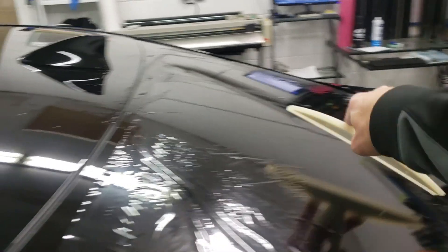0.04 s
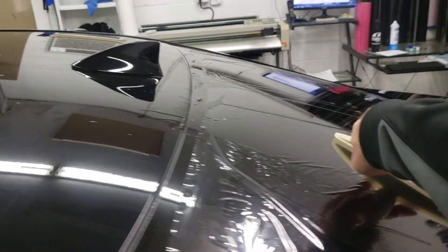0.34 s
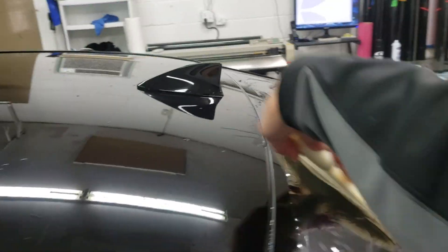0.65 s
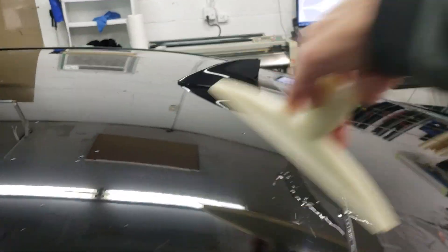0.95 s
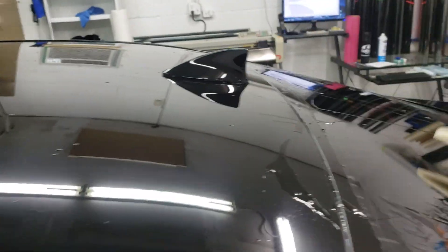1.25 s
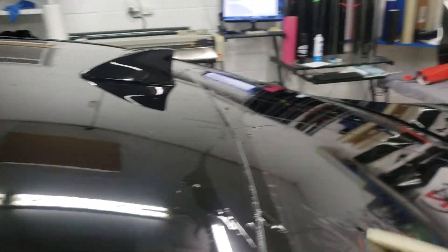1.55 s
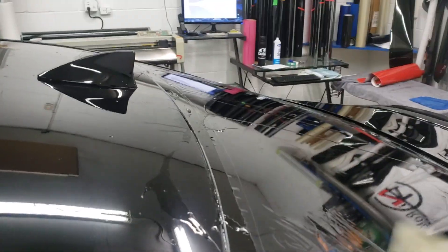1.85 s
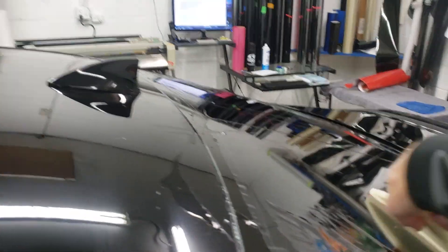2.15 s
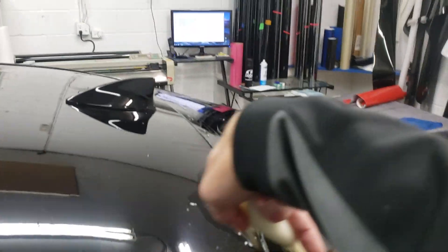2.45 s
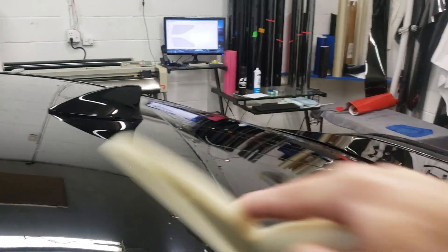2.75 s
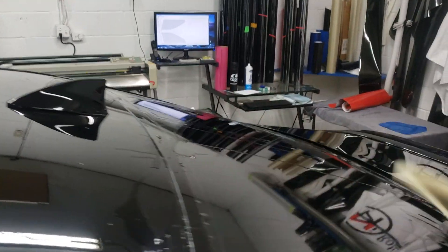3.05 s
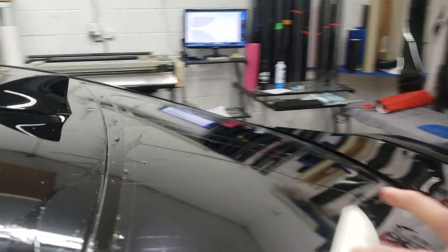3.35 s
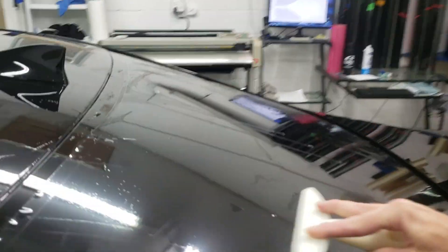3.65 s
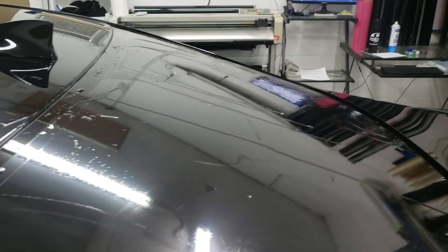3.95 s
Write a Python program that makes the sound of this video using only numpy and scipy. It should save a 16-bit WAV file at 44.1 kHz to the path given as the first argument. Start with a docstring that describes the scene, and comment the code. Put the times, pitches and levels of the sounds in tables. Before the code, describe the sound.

Close, thin hissing swipes of a squeegee on filmed glass come and go over a workshop's machine hum and ventilation. One sharp snap comes early and two short squeaks follow, among light ticks and a few low thumps.

```python
"""A quiet workshop with a steady machine hum, where a plastic squeegee is worked over film on a car's glass.
Sliding friction makes blade and sleeve swish, with thin whistles whose pitch rises and falls with speed.
The film ticks; the blade snaps off the edge, rings freely, rasps, and squeaks twice by stick-slip motion.
Four dull thumps, probably steps, excite low damped modes underneath, and the room reverberates."""
import sys
import numpy as np
from scipy import signal
from scipy.fft import rfft, irfft
from scipy.io import wavfile

SR = 44100
rng = np.random.default_rng(int(sys.argv[2]) if len(sys.argv) > 2 else 0)


def to_wav(s):
    """Save 16-bit WAV."""
    ch = np.atleast_2d(s).T  # columns
    pcm = np.round(np.clip(ch, -1, 1) * 32767)  # PCM
    wavfile.write(sys.argv[1], SR, pcm.astype(np.int16))


N = 176400

# Throughout, pan_db is left minus right, and gain_db in a spectrum is relative.
# main machine hum: time_s, level_db, pan_db
HUM_ENVELOPE = [(0.04, -31.5, 0.5), (0.44, -29.5, -2.0), (1.17, -31, -4.5), (2.03, -29, -4.0),
                (2.66, -30, -5.0), (3.11, -29.5, -4.0), (3.6, -28, -1.5), (3.73, -31, 0), (3.96, -31, 1)]
# weaker machine tones: pitch_hz, level_db
MACHINE_TONES = [(95, -48.5), (120, -50.5), (146.5, -82.5), (183, -60.5), (480, -62.5), (1178, -80),
                 (15150, -81)]
# ventilation spectrum: frequency_hz, gain_db
AIR_SPECTRUM = [(20, -28.5), (33, -17), (52, 1), (100, -1), (200, 1.5), (290, -3), (330, -5), (460, -6),
                (600, -15), (1000, -20.5), (1700, -28.5), (3000, -34), (4600, -34), (6000, -38),
                (7400, -50), (8300, -45.5), (9400, -36.5), (10800, -34), (12000, -26.5), (13800, -33.5),
                (16000, -36.5)]
# ventilation loudness: time_s, level_db
AIR_ENVELOPE = [(0, -39.5), (.7, -41.5), (.85, -40.5), (1.2, -40.5), (2, -39.5), (2.7, -39.5), (3.3, -40),
                (4, -39.5)]
# ventilation balance: frequency_hz, pan_db
AIR_BALANCE = [(40, -2.5), (200, -1.5), (450, -5), (1000, -1), (2000, 6.5), (3200, 7), (4700, 8),
               (6500, 3.5), (8700, -4), (12000, -10.5), (15500, 1.5)]
# likeness of the ventilation's two channels: frequency_hz, correlation
AIR_CORRELATION = [(40, 0.89), (280, 0.98), (500, 0.45), (900, 0), (2000, 0), (16000, 0)]
# colour of close sounds at the microphone: frequency_hz, gain_db
CLOSE_SPECTRUM = [(100, -31.5), (1000, -6.5), (2500, -13.5), (4500, -19), (6300, -21), (7600, -23.5),
                  (8400, -26), (9400, -10.5), (10600, -9), (11900, -1), (13800, -10), (16000, -11.5)]
# squeegee strokes: peak_s, rise_s, fall_s, level_db, pan_db, scrape_gain_db
STROKES = [(.11, .08, 0.113, -58.5, -18, -13), (.32, 0.058, 0.14, -54, -11.5, -11.5),
           (.63, .07, 0.16, -50, -7.5, -13.5), (.81, 0.076, 0.1, -56, 3, -29),
           (1.3, 0.17, .15, -54.5, -11, -20), (1.39, 0.082, 0.069, -42.5, -8, -24),
           (1.66, 0.18, 0.29, -50.5, -5, -14), (2.44, 0.09, 0.095, -51, -1, -21),
           (2.7, 0.14, 0.2, -60.5, -13, -9.5), (3.738, 0.065, 0.11, -45.5, -8.5, -13),
           (3.9, 0.08, 0.17, -50.5, -5.5, -4.5)]
# swish under light pressure: frequency_hz, gain_db
LIGHT_SPECTRUM = [(200, -42), (5000, -14), (8000, -9.5), (9500, 3), (11500, 8), (13000, 9), (16000, 6.5)]
# swish under heavy pressure: frequency_hz, gain_db
HEAVY_SPECTRUM = [(200, -25.5), (5000, -10), (8000, -3.5), (9500, 6.5), (11500, 4.5), (13000, -7),
                  (16000, -7)]
# scrape below the swish: frequency_hz, gain_db
SCRAPE_SPECTRUM = [(200, -10.5), (700, 1.5), (2300, 5), (4500, 1), (6300, -4.5), (7600, -11), (16000, -27)]
# friction whistles: peak_s, half_length_s, top_pitch_hz, sag_fraction, level_db
WHISTLE_ARCS = [(.105, .085, 14700, .085, -62), (.11, .085, 11950, .05, -58.5), (.115, .06, 9300, .05, -65),
                (.25, .07, 11600, .03, -56), (.26, .08, 12300, .05, -59), (.355, .04, 9650, .08, -61),
                (.355, .07, 15400, .13, -62), (.545, .06, 12600, .06, -60), (.605, .045, 11750, .06, -54),
                (.66, .07, 12700, .09, -58), (2.455, .06, 11550, .035, -49.5),
                (2.405, .035, 11400, .11, -57), (2.435, .04, 10300, .06, -60),
                (2.728, .04, 11000, .08, -56)]
# ticks of the film: start_s, level_db, pan_db, decay_s, centre_hz
FILM_TICKS = [(.03, -40, -8, 0.0018, 12600), (0.2404, -25, -5, 0.0009, 12800),
              (.585, -41, -11, .002, 11700), (.739, -36, 3, 0.0018, 14000), (.748, -39.5, 7, .002, 14000),
              (.809, -37.5, 1, .002, 11200), (.85, -48, 6, .002, 9360), (1.5464, -28.5, -1, 0.0013, 14000),
              (1.551, -34.5, -8, .0016, 12300), (1.586, -43, -6, .0016, 12000),
              (1.617, -42, -11, 0.0011, 10500), (1.6311, -24.5, -12, 0.00055, 10700),
              (1.646, -38, 1, 0.0013, 11000), (1.686, -40, -2, 0.00138, 10000),
              (1.703, -37, -12, .0016, 11000), (1.933, -37, 3, 0.001, 9700), (3.684, -45, -8, .002, 12000),
              (3.98, -41.5, -16, .0016, 10800)]
# soft heavy blows: start_s, level_db, tilt_db_per_octave, pan_db
BLOWS = [(.254, -28, -1, -4), (1.383, -28, 1, -3.5), (2.169, -30.5, 2, -2.5), (3.684, -26, -4, -3)]
# modes the blows excite: pitch_hz, gain_db, t60_s
BLOW_MODES = [(101.7, 1, .25), (146, 2.5, 0.23), (200.6, 1, 0.093), (285, -3.5, 0.17), (400, -12.5, .12)]
# loose shudder after a blow: frequency_hz, gain_db
SHUDDER_SPECTRUM = [(40, -32), (85, -4), (150, 2.5), (210, -5.5), (330, -12), (600, -26.5), (1500, -46),
                    (5000, -62)]
# hard contacts within the thumps: start_s, level_db
CONTACTS = [(.253, -41), (.2925, -35), (1.384, -34), (1.4, -39.5), (1.42, -43.5), (2.169, -46.5),
            (3.685, -38.5)]
# colour of those contacts: frequency_hz, gain_db
CONTACT_SPECTRUM = [(60, -19.5), (300, -2), (700, 6.5), (1000, -7.5), (1500, -8.5), (2500, -26.5),
                    (5000, -22.5), (7500, -40), (16000, -39.5)]
# blade snapping off the edge: start_s, level_db, decay_s
BLADE_SNAPS = [(0.9044, -23, .003), (.912, -34, 0.021)]
# colour of the snap: frequency_hz, gain_db
SNAP_SPECTRUM = [(100, -11), (450, 19), (750, 0.5), (1600, -1.5), (3000, -18), (6500, -13), (7600, -25),
                 (9300, -5), (10600, -5), (11900, 12), (13800, -0.5), (16000, 1)]
# hollow ring of the freed blade: pitch_hz, level_db, t60_s
BLADE_RING = [(430, -51, 0.09), (511, -35, 0.19), (1100, -57.5, 0.11), (1424, -51.5, 0.14),
              (1830, -55, 0.096)]
# dry catches of the blade: start_s, length_s, level_db, pan_db
BLADE_RASPS = [(0.919, .03, -48, 0), (2.641, .014, -41.5, 5), (2.649, .035, -44, 4)]
# colour of the rasps: frequency_hz, gain_db
RASP_SPECTRUM = [(1000, -11), (3500, -2), (6000, 10), (9500, -3), (11500, 5), (14000, 9), (16000, 5)]
# course of each squeak: time_s, pitch_hz, level_db, roughness_fraction
SQUEAK_PATHS = [
    [(1.787, 2000, -54, .25), (1.793, 1950, -36, .25), (1.803, 1915, -35, .35), (1.812, 1820, -33.5, .45),
     (1.824, 1725, -33.5, .55), (1.833, 1850, -42, .6), (1.845, 1900, -56, .7)],
    [(2.654, 1230, -60, .4), (2.665, 1200, -47, .2), (2.675, 1185, -44, .1), (2.684, 1200, -49, .2),
     (2.695, 1220, -60, .4)],
]
# resonances of blade and glass for each squeak: pan_db, rows of (frequency_hz, gain_db)
SQUEAK_RESONANCES = [(-1, [(800, -26), (1850, -9), (2500, -17), (3300, 2), (3520, 1.5), (3900, -7),
                     (4400, -14), (5200, -9), (5800, -6), (6800, -22), (8400, -20), (9500, -6), (10800, 1),
                     (11600, -1), (13300, 0), (14500, -12)]), (5, [(600, -18), (1190, 0), (2400, -5),
                     (3500, -24), (5000, -22), (7600, -28), (10500, -10), (12800, -4), (15500, -12)])]
# balance across a squeak's spectrum: frequency_hz, pan_db
SQUEAK_BALANCE = [(2000, 0), (5700, 3.5), (9500, 1), (13000, 3)]
# reverberation time of the workshop: frequency_hz, t60_s
ROOM_DECAY = [(100, 0.27), (1000, 0.72), (4000, .5), (10000, 0.35), (16000, 0.59)]


def amp(db):
    """Amplitude grows tenfold for every 20 decibels."""
    return 10 ** (np.asarray(db) / 20)


def unit(x):
    """Normalisation to rms 1."""
    return x / np.sqrt(np.mean(x ** 2) + 1e-20)


def read(points, hz):
    """Interpolation on a log-frequency axis."""
    f, value = np.transpose(points)
    return np.interp(np.log(hz + 1), np.log(f + 1), value)


def pan(db):
    """A level difference between left and right gives direction."""
    return amp([[db / 2], [-db / 2]])


def add(mix, start_s, sound):
    """Superposition: a sound sums into the mix from its start time."""
    part = mix[:, max(round(start_s * SR), 0):][:, :sound.shape[-1]]
    part += sound[..., :part.shape[1]]


def colour(x, *curves, size=4096):
    """Minimum-phase filtering at unit power; spectra in cascade add in decibels."""
    db = sum(read(c, abs(np.fft.fftfreq(size, 1 / SR))) for c in curves)
    response = np.exp(np.conj(signal.hilbert(np.log(amp(db)))))
    taps = np.fft.ifft(response).real[:size // 2]
    return signal.oaconvolve(x, taps[None] / np.linalg.norm(taps), axes=1)[:, :N]


def drift(rate_hz, count=N):
    """Low-passed noise gives a random fluctuation of rms about 1."""
    spectrum = rfft(rng.standard_normal(N)) / (1 + (np.fft.rfftfreq(N, 1 / SR) / rate_hz) ** 4)
    return unit(irfft(spectrum, N))[:count]


def burst(decay_s):
    """A brief contact is broadband: exponentially decaying noise, independent in each channel."""
    t = np.arange(SR // 8) / SR
    return rng.standard_normal((2, len(t))) * np.exp(-t / decay_s)


def ring(modes, t):
    """Free vibration is a sum of damped sinusoidal modes."""
    return sum(amp(db - 60 * t / t60) * np.sin(2 * np.pi * hz * t) for hz, db, t60 in modes)


def machine_hum(pitch_hz=239.9, waver_db=0.4548, waver_rad=0.36):
    """Periodic vibration radiates tones: a strong one wavers in level, weaker ones in phase."""
    t = np.arange(N) / SR
    times, db, pan_db = np.transpose(HUM_ENVELOPE)
    side = np.interp(t, times, pan_db)
    level_db = np.interp(t, times, db) + waver_db * drift(3.6) + np.array([side, -side]) / 2
    hum = amp(level_db) * np.sin(2 * np.pi * pitch_hz * t)
    tones = sum(amp(db) * np.sin(2 * np.pi * hz * t + waver_rad * drift(7.4))
                for hz, db in MACHINE_TONES)
    return np.sqrt(2) * (hum + tones)


def ventilation():
    """Broadband air noise is partly coherent: the channels agree in the bass but not in the treble."""
    t, hz = np.arange(N) / SR, np.fft.rfftfreq(N, 1 / SR)
    left, independent = rfft(rng.standard_normal((2, N)))
    correlation, side = np.clip(read(AIR_CORRELATION, hz), -1, 1), read(AIR_BALANCE, hz)
    right = correlation * left + np.sqrt(1 - correlation ** 2) * independent
    spectrum = np.array([left, right]) * amp(read(AIR_SPECTRUM, hz) + np.array([side, -side]) / 2)
    return amp(np.interp(t, *np.transpose(AIR_ENVELOPE))) * unit(irfft(spectrum, N))


def swipes(grains_per_s=1000, grain_depth=0.25, grain_spread_db=6, flutter_db=1, half_dark_db=-44):
    """Sliding friction makes grainy hiss that darkens with pressure, over a lower scrape."""
    t = np.arange(N) / SR
    swish_power, scrape_power = np.zeros((2, N)), np.zeros(N)
    for peak_s, rise_s, fall_s, db, pan_db, scrape_db in STROKES:
        swell = amp(db) * np.exp(-((t - peak_s) / np.where(t < peak_s, rise_s, fall_s)) ** 2)
        swish_power += (swell * pan(pan_db)) ** 2
        scrape_power += (swell * amp(scrape_db)) ** 2
    pressed = swish_power.mean(0) / (swish_power.mean(0) + amp(half_dark_db) ** 2)
    onsets = rng.random(N) < grains_per_s / SR
    grains = onsets * amp(grain_spread_db * np.minimum(rng.exponential(1, N), 4))
    texture = 1 + grain_depth * unit(grains)
    light, heavy = (unit(rng.standard_normal((2, N)) * texture) * amp(flutter_db * drift(60))
                    for _ in range(2))
    swish = colour(light * np.sqrt(swish_power * (1 - pressed)), CLOSE_SPECTRUM, LIGHT_SPECTRUM)
    swish += colour(heavy * np.sqrt(swish_power * pressed), CLOSE_SPECTRUM, HEAVY_SPECTRUM)
    return swish + colour(light * np.sqrt(scrape_power), SCRAPE_SPECTRUM)


def whistle(half_s, top_hz, sag, fuzz=0.45, width_hz=70):
    """Fine ribs rubbing past each other sing at their passing rate, which arches with stroke speed."""
    u = np.arange(-half_s, half_s, 1 / SR) / half_s
    phase = 2 * np.pi * np.cumsum(top_hz * (1 - sag * u ** 2)) / SR
    waver = 1 + fuzz * (drift(width_hz, len(u)) + 1j * drift(width_hz, len(u)))
    return unit((waver * np.exp(1j * phase)).real) * np.sqrt(np.maximum(1 - u ** 2, 0))


def whistles(neighbours=2, neighbour_db=-7, pitch_spread=0.06, time_spread_s=0.03):
    """Several contact points sound at once, so fainter detuned whistles superpose on each main one."""
    out = np.zeros((2, N))
    for peak_s, half_s, top_hz, sag, db in WHISTLE_ARCS:
        gain = amp(db) * pan(-7)
        add(out, peak_s - half_s, gain * whistle(half_s, top_hz, sag))
        for shift, detune in rng.uniform(-1, 1, (neighbours, 2)):
            neighbour = whistle(half_s, top_hz * (1 + pitch_spread * detune), sag)
            add(out, peak_s - half_s + time_spread_s * shift, gain * amp(neighbour_db) * neighbour)
    return out


def film_ticks(impulse_height=2.44, skirt_db=-13):
    """Impulse excitation: each crack of the film and its noisy tail pass through one broad resonance."""
    out = np.zeros((2, N))
    for start_s, db, pan_db, decay_s, hz in FILM_TICKS:
        resonance = [(hz * .7, skirt_db), (hz, 0), (hz * 1.4, skirt_db)]
        crack = burst(decay_s) + impulse_height * signal.unit_impulse(SR // 8)
        add(out, start_s, amp(db) * pan(pan_db) * colour(crack, CLOSE_SPECTRUM, resonance))
    return out


def thumps(rise_s=0.0033, pivot_hz=140, shudder_db=-4.5, shudder_s=0.023, contact_decay_s=0.009):
    """Soft impacts excite low modes and a loose shudder; short hard contacts add higher frequencies."""
    body, knocks = np.zeros((2, 2, N))
    t = np.arange(SR // 2) / SR
    for start_s, db, tilt, pan_db in BLOWS:
        modes = [(hz, gain + tilt * np.log2(hz / pivot_hz), t60) for hz, gain, t60 in BLOW_MODES]
        blow = -ring(modes, t) * (1 - np.exp(-t / rise_s))
        loose = rng.standard_normal((1, len(t))) * t / shudder_s * np.exp(1 - t / shudder_s)
        spectrum = [(hz, gain + tilt * np.log2(hz / pivot_hz)) for hz, gain in SHUDDER_SPECTRUM]
        shudder = amp(shudder_db) * colour(loose, spectrum)[:, :len(t)]
        add(body, start_s, amp(db) * pan(pan_db) * (blow + shudder))
    for start_s, db in CONTACTS:
        add(knocks, start_s, amp(db) * burst(contact_decay_s))
    return body + colour(knocks, CONTACT_SPECTRUM)


def blade_snap():
    """Sudden release at the edge gives a sharp transient and leaves the blade in free vibration."""
    cracks, ringing = np.zeros((2, 2, N))
    for start_s, db, decay_s in BLADE_SNAPS:
        add(cracks, start_s, amp(db) * burst(decay_s))
    add(ringing, BLADE_SNAPS[0][0], ring(BLADE_RING, np.arange(SR // 4) / SR))
    return colour(cracks, SNAP_SPECTRUM) + ringing


def blade_rasps():
    """Dry friction gives a short swell of bright noise wherever the blade catches."""
    out = np.zeros((2, N))
    for start_s, length_s, db, pan_db in BLADE_RASPS:
        t = np.arange(0, length_s, 1 / SR)
        swell = np.sin(np.pi * np.sqrt(t / length_s))
        add(out, start_s, amp(db) * pan(pan_db) * swell * rng.standard_normal((2, len(t))))
    return colour(out, CLOSE_SPECTRUM, RASP_SPECTRUM)


def blade_squeaks(jitter=0.065, shimmer=0.49, hiss_db=-4.5):
    """Stick-slip oscillation gives a harmonic series that jitters and turns to hiss as it roughens."""
    out = np.zeros((2, N))
    for path, (pan_db, resonances) in zip(SQUEAK_PATHS, SQUEAK_RESONANCES):
        times, hz, db, rough = np.transpose(path)
        t = np.arange(times[0], times[-1], 1 / SR)
        hz, db, rough = (np.interp(t, times, v) for v in (hz, db, np.clip(rough, 0, 1)))
        phase = 2 * np.pi * np.cumsum(hz * (1 + jitter * rough * drift(600, len(t)))) / SR
        for channel, sign in enumerate((1, -1)):
            harmonics = np.zeros(len(t))
            for n in range(1, 14):
                gain = (n * hz < SR / 2) * (1 + shimmer * drift(110, len(t)))
                harmonics += gain * np.sin(n * phase + 2 * np.pi * rng.random())
            hiss = amp(hiss_db) * rng.standard_normal(len(t))
            slips = np.sqrt(1 - rough) * unit(harmonics) + np.sqrt(rough) * hiss
            slips *= amp(db + sign * pan_db / 2)
            balance = [(f, sign * side / 2) for f, side in SQUEAK_BALANCE]
            add(out[channel:channel + 1], times[0], colour(slips[None], resonances, balance))
    return out


def room(x):
    """Reverberation is convolution with sparse reflections, each band decaying at its own rate."""
    taps = rng.standard_normal((2, SR)) * (rng.random((2, SR)) < .1)
    taps[:, :SR // 250] = 0  # 4 ms before the first reflection
    hz, t, bands = signal.stft(taps, SR, nperseg=256)
    decay = amp(-60 * t / read(ROOM_DECAY, hz)[:, None])
    tail = signal.istft(bands * decay, SR, nperseg=256)[1]
    return signal.fftconvolve(x, tail / np.linalg.norm(tail[0]), axes=1)[:, :N]


def scene(room_db=-10, squeak_room_db=-7.5):
    """Direct sound, its reflections and the workshop's background add by superposition."""
    work = swipes() + whistles() + film_ticks() + thumps() + blade_snap() + blade_rasps()
    squeaks = blade_squeaks()
    reflections = room(amp(room_db) * work + amp(squeak_room_db) * squeaks)
    return machine_hum() + ventilation() + work + squeaks + reflections


def record(dry, cutoff_hz=15900):
    """Band limiting: a linear-phase low-pass filter removes the highest treble."""
    taps = signal.firwin(511, cutoff_hz, window=("kaiser", 9), fs=SR)
    return signal.oaconvolve(dry, taps[None], "same")


dry = scene()
out = record(dry)
to_wav(out)
```